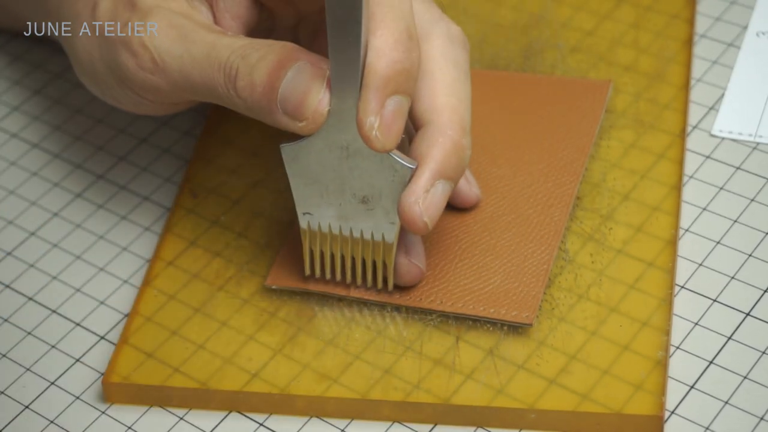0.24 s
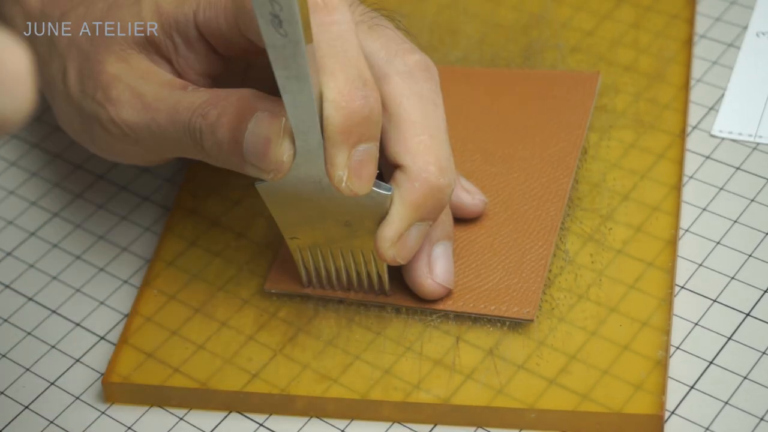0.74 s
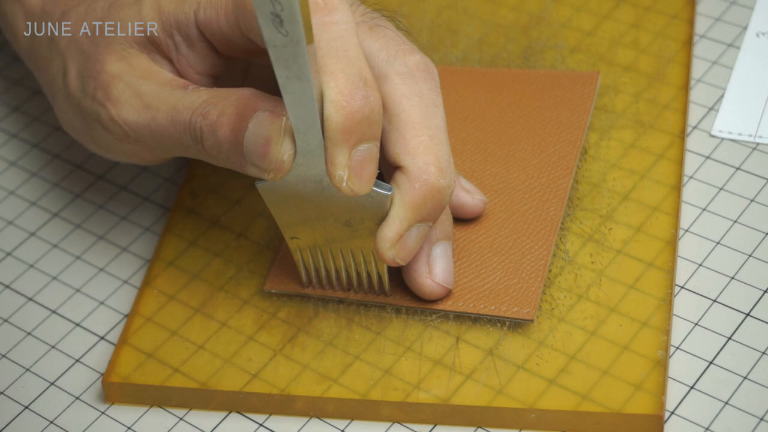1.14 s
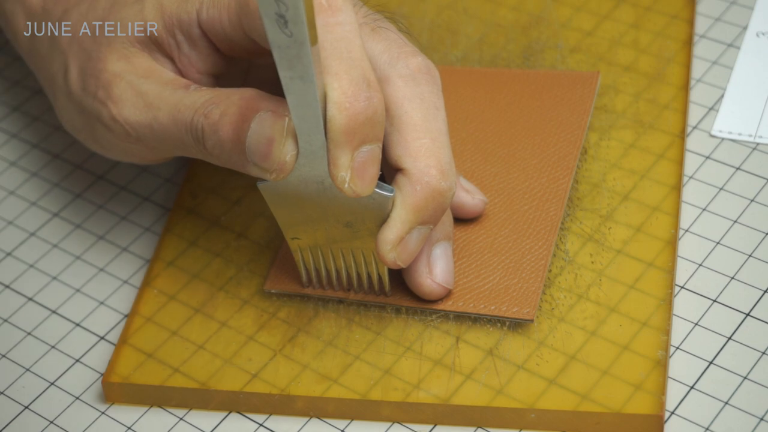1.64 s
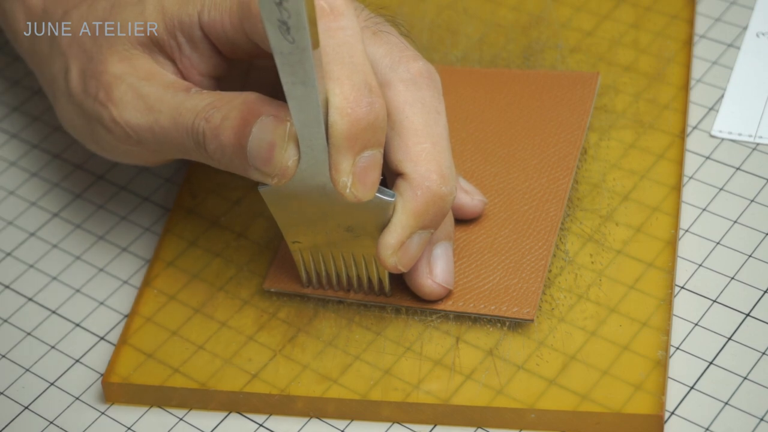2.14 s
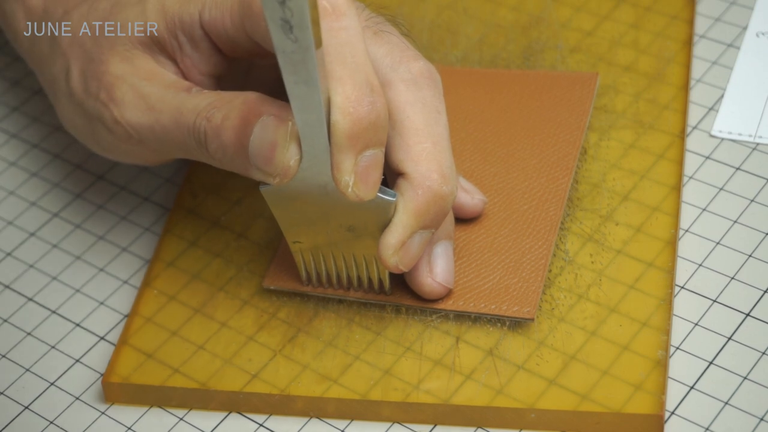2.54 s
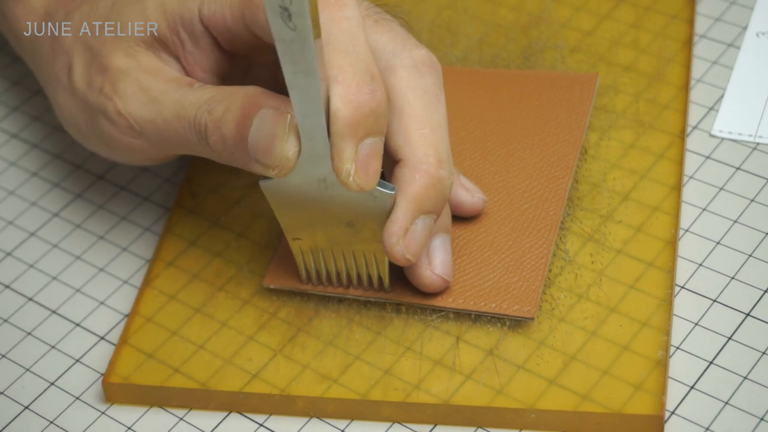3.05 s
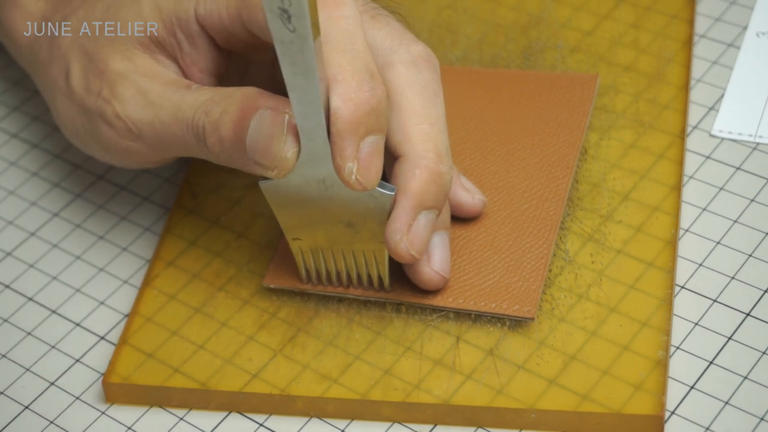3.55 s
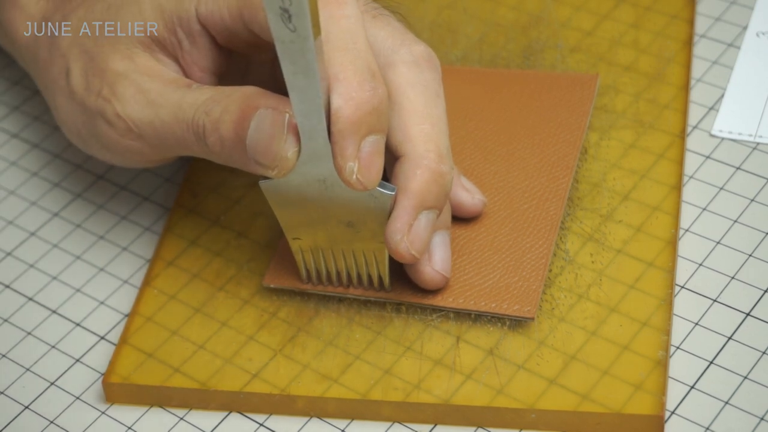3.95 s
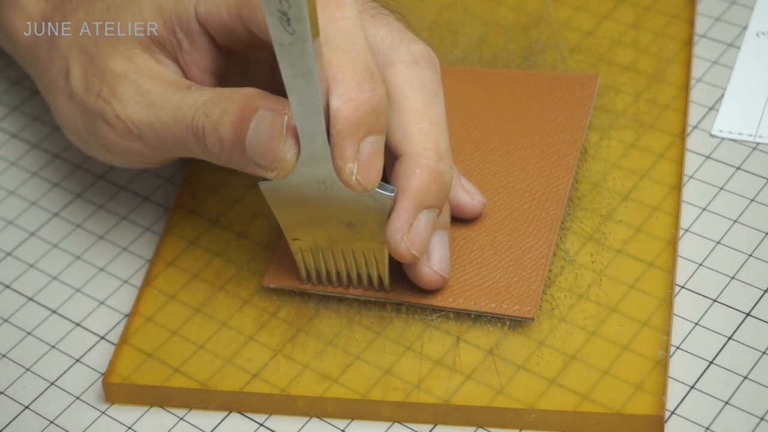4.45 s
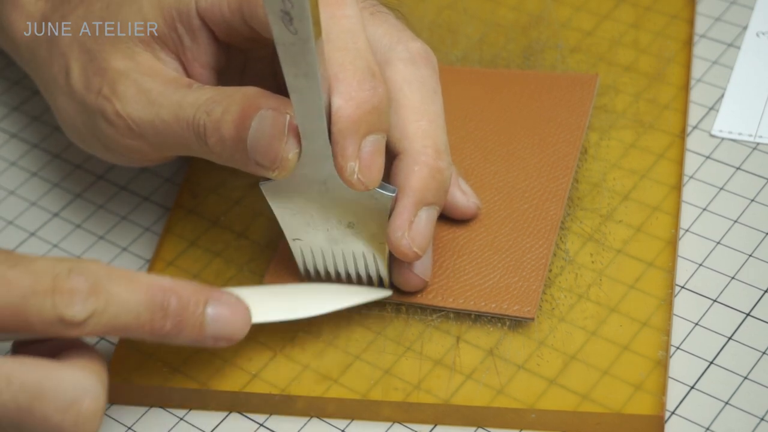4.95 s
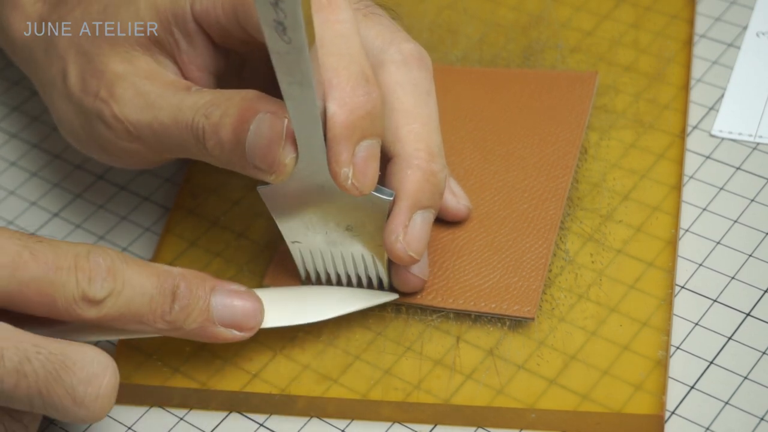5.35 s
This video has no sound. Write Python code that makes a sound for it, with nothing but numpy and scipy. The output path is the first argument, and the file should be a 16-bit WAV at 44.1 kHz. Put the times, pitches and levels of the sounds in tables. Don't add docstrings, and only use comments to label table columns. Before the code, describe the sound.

Quiet traffic hush and thin hiss, then one soft metallic tap and four loud, cracking mallet strikes, unevenly spaced, close up. Each dips the recording level, so the room's ring swells back behind it, with bright steel tinkles. A wooden handle clacks onto the bench and bounces to rest; after near quiet, a small tool clicks lightly as it is picked up.

```python
import sys
import numpy as np
from scipy import signal
from scipy.io import wavfile
from scipy.ndimage import uniform_filter1d

SR = 44100
rng = np.random.default_rng(int(sys.argv[2]) if len(sys.argv) > 2 else 0)


def boost(x):
    u = np.asarray(x, float) / 20
    return 10 ** u


def file_out(sig):
    cols = np.atleast_2d(sig).T
    lim = np.clip(cols, -1, 1)
    pcm = np.round(lim * 32767).astype(np.int16)
    wavfile.write(sys.argv[1], SR, pcm)


N = 247401

# [t/s, peak level/dB, gain duck/dB, room over the peak/dB, brightness/dB per octave]
BLOWS = [
    (0.8775, -30.5, 7.5, -9, 0),
    (1.349, -12, 7.5, -7, -3),
    (1.7829, -10, 15, -8.5, -1),
    (2.3234, -10.5, 15.5, -8, -1.5),
    (2.6633, -8.5, 13, -8.5, -1),
]
# [f/Hz, t60/s]
ROOM_DECAY = [(100, 0.74), (300, 0.67), (1000, 0.65), (3000, 0.67), (7000, 0.57), (15000, 0.37)]
# [f/Hz, correlation]
ROOM_ALIKE = [(60, .995), (130, .995), (290, .97), (640, .85), (1410, .55), (3100, .3), (6000, -.2),
              (9000, 0), (15000, -.2)]


def unit(x):
    return x / np.sqrt(np.mean(x ** 2) + 1e-20)


def along(points, hz):
    f, v = np.transpose(points)
    return np.interp(np.log(hz + 1), np.log(f + 1), v)


def curves(rows):
    s, *cols = np.transpose(rows)
    return [np.interp(np.arange(N) / SR, s, c) for c in cols]


def add(out, s, x):
    part = out[:, round(s * SR):][:, :x.shape[-1]]
    part += x[..., :part.shape[1]]


def wobble(shape, rate):
    place = np.arange(shape[-1]) * rate / SR
    knots = rng.standard_normal((shape[0], int(place[-1]) + 2))
    ease = .5 - .5 * np.cos(np.pi * (place % 1))
    left = place.astype(int)
    return knots[:, left] * (1 - ease) + knots[:, left + 1] * ease


def diffuse(size, spectrum, alike, tilt_db, patchy_db, decay=None):
    # [f/Hz, left minus right/dB]
    side_lean = [(60, 0), (240, 0.5), (950, -1.5), (3770, -2), (15000, -2.5)]
    hz, t, z = signal.stft(rng.standard_normal((2, size)), SR, nperseg=1024, noverlap=768)
    field = uniform_filter1d(rng.standard_normal(z.shape[1:]), 8, 0)
    field = uniform_filter1d(field, 6, 1)
    colour = boost(along(spectrum, hz) + tilt_db * np.log2((hz + 50) / 1000))[:, None]
    z = z * boost(patchy_db * unit(field)) * colour / np.sqrt(np.mean(colour ** 2))
    if decay:
        z = z * boost(-60 * t / along(decay, hz)[:, None])
    turn = np.arccos(np.clip(along(alike, hz), -1, 1))[:, None] / 2
    mid, side = z[0] * np.cos(turn), z[1] * np.sin(turn)
    lean = boost(along(side_lean, hz) / 2)[:, None]
    pair = np.array([(mid + side) * lean, (mid - side) / lean])
    return signal.istft(pair, SR, nperseg=1024, noverlap=768)[1][:, :size]


def ring(modes, t, attack, waver):
    hz, db, t60 = np.transpose(modes)[..., None]
    size = boost(db + 2 * rng.standard_normal(db.shape) - 60 * t / t60)
    size = size * boost(2.5 * waver * wobble(size.shape, 45))
    phase = 2 * np.pi * hz * t + waver * wobble(size.shape, 29.9)
    return np.sum(size * np.sin(phase), axis=0) * (1 - np.exp(-t / attack))


def swell(start, attack, hold, release, hz, db, rest_db, flutter_db):
    corners = np.cumsum([start, attack, hold, release])
    level_db = np.interp(np.arange(N) / SR, corners, [rest_db, db, db, rest_db])
    phase = 2 * np.pi * np.cumsum(hz + 5 * wobble((1, N), 15)) / SR
    return boost(level_db + flutter_db * wobble((1, N), 25)) * np.sin(phase)


def air():
    # [t/s, level/dB]
    traffic = [(0, -52), (.25, -56), (.5, -55), (.85, -51.5), (1.3, -53.5), (3.6, -54), (4.7, -54.5),
               (5.3, -56), (5.61, -56)]
    # [f/Hz, level/dB per Hz]
    street_colour = [(135, -62), (170, -36), (240, -24.5), (350, -11.5), (470, -12.5), (680, -6.5),
                     (1100, -5.5), (1700, -3), (2300, -4), (2900, -9.5), (3600, -15), (5000, -21),
                     (7000, -35), (10000, -72)]
    # [f/Hz, correlation]
    street_alike = [(60, 0.49), (130, 0.85), (290, 0.63), (640, 0.62), (1410, 0.56), (3100, 0.39),
                    (6820, -1.1), (15000, -0.74)]
    # [f/Hz, level/dB per Hz]
    hiss_colour = [(1000, -15.5), (4000, 4), (7000, -0.5), (10000, -2), (13000, -4), (16000, -11)]
    # [start t/s, attack/s, hold/s, release/s, f/Hz, level/dB, rest level/dB, flutter/dB]
    brake_squeal = (.22, .09, .24, .012, 2250, -61, -90, 1.5)
    engine_drone = (3.8, .12, .12, .1, 348, -71, -86, 5)
    engine_hum = (3.3, .3, .7, .3, 168, -94, -99, 4)
    street_db, = curves(traffic)
    after = np.arange(N) / SR - 2.04
    sag_db = -np.clip(10.5 - 2.5 * after, 0, None) * np.clip(after / .3, 0, 1)
    street = boost(street_db) * diffuse(N, street_colour, street_alike, 0, patchy_db=0.5)
    hiss = boost(-67) * diffuse(N, hiss_colour, [(1000, 0.12)], 0, patchy_db=-1.5)
    return boost(sag_db) * (street + hiss) + swell(*brake_squeal) + swell(*engine_drone) + swell(*engine_hum)


def jingles():
    # [f/Hz, t60/s]
    steel_modes = [(5480, 0.52), (7560, 0.25), (7770, 1), (9308, 0.16), (9647, 0.12), (10180, 0.19),
                   (11280, 0.19), (12180, .12), (13130, .15)]
    # [t/s, peak level/dB, ring level/dB, most ringing part f/Hz]
    shaken = [(1.361, -38.5, 1, 5480), (1.372, -33, 4, 11280), (1.8, -38, -5, 10180), (1.86, -25, -9, 9308),
              (2.34, -33, -6.5, 7770), (2.394, -17, -15, 13130), (2.455, -26, -5, 10180),
              (2.69, -19.5, -16, 7500), (2.725, -20, -12.5, 10180), (2.869, -33.5, -13.5, 7770),
              (2.918, -31.5, -5, 9647), (2.961, -35, -8, 10180), (3.041, -36.5, -18, 13130),
              (3.197, -54, -16, 7560)]
    # [t/s, peak level/dB, ring level/dB, part f/Hz]
    handled = [
        (.8925, -48, -18, 10180),
        (4.4133, -51, -16, 10180),
        (4.421, -68, -4, 7560),
        (4.947, -65, -15, 9308),
        (5.06, -54.5, -28, 9308),
        (5.54, -69, -17, 7770),
    ]
    out, t = np.zeros((2, N)), np.arange(SR // 3) / SR
    contacts = [(*row, -4.5) for row in shaken]
    contacts += [(*row, -17) for row in handled]
    echo_colour = [(1500, 4), (4000, 2.5), (9000, -6.5), (16000, -10.5)]  # f/Hz, level/dB per Hz
    for s, db, ring_db, part_hz, echo_db in contacts:
        modes = [(hz, ring_db - 90 * abs(np.log2(hz / part_hz)), t60)
                 for hz, t60 in steel_modes if .8 < hz / part_hz < 1.25]
        click = uniform_filter1d(rng.standard_normal((2, len(t))), size=3) * boost(4.5 - 60 * t / 0.0138)
        click = click - uniform_filter1d(click, size=16)
        echo = diffuse(len(t), echo_colour, ROOM_ALIKE, 0, patchy_db=2.5, decay=ROOM_DECAY)
        steel = [ring(modes, t, .001, waver=.7), ring(modes, t, .001, waver=.7)]
        tick = click + steel * boost([[-1.5], [1.5]]) + boost(echo_db) * echo
        add(out, s, boost(db) * tick * np.cos(1.5 * np.pi * t))
    return out


def knocks():
    # [t/s, peak level/dB, room over the peak/dB, brightness/dB per octave]
    contacts = [(0.8922, -28.5, -27, 9.5), (3.184, -28.5, -9, 7.5), (3.1981, -9.5, -16, -1.5),
                (3.2256, -35, -23, 1), (3.241, -19.5, -17.5, -3), (3.2555, -27, -25, -0.5),
                (3.274, -28, -23, -4), (3.314, -34, -17, 0), (3.333, -26.5, -32, -13.5),
                (3.344, -34, -17, 0), (4.405, -50, -13, 3), (4.4133, -38, -12.5, 10.5),
                (4.4198, -40.5, -18, 7.5)]
    # [f/Hz, level/dB, t60/s]
    handle = [(797, -2, 0.03), (1013, 0, 0.009), (1300, 12.5, 0.0083), (1710, 4.5, 0.017), (2410, -6, 0.03),
              (3800, -15.5, 0.011), (5160, -14.5, 0.0054)]
    # [f/Hz, level/dB per Hz]
    dull_room = [(59, -75), (100, -41), (339, -8), (458, -11), (684, 2.5), (741, -10), (819, 1.5),
                 (924, 0.5), (1720, -2), (3010, -22.5), (12000, -61), (15600, -90), (22000, -120)]
    out, t = np.zeros((2, N)), np.arange(SR // 2) / SR
    for s, db, room_db, tilt_db in contacts:
        modes = [(hz, level + tilt_db * np.log2(hz / 1000), t60 * boost(-.6 * tilt_db))
                 for hz, level, t60 in handle]
        snap = np.diff(uniform_filter1d(rng.standard_normal(len(t) + 1), size=6))
        snap = snap * boost(-11.5 + 1.46 * tilt_db - 60 * t / 0.002)
        room = diffuse(len(t), dull_room, ROOM_ALIKE, tilt_db, patchy_db=0.5, decay=ROOM_DECAY)
        room = room * (1 - np.exp(-t / 0.00097))
        wood = boost(-6.0) * (ring(modes, t, 0.00064, waver=0) + snap) * boost([[-1], [1]])
        add(out, s, boost(db) * (wood + boost(room_db) * room))
    return signal.sosfilt(signal.butter(3, 260, 'high', fs=SR, output='sos'), out)


def blows():
    # [delay/ms, left level/dB, right level/dB]
    echoes = [(1.7, -14, -15), (2.65, -9, -9), (3.9, -5, -3), (5.2, -13, -11), (7.5, -10, -10)]
    # [f/Hz, level/dB, t60/s]
    bench = [(116.9, -24, 0.59), (129, -27.5, 0.46), (182, -26, 0.57), (233, -20, 0.74), (315, -28, 0.39),
             (453, -14.5, 0.58), (520, -28, 0.37), (571, -18.5, 0.66), (616, -13.5, 0.56),
             (684, -18.5, 0.72), (806, -13, 0.59), (1069, -16, 0.73), (1381, -20.5, 0.77),
             (1977, -17, 0.66)]
    # [f/Hz, level/dB per Hz]
    tap_room = [(60, -56), (120, -20), (250, -9), (400, -4), (600, 0.5), (850, -4.5), (1200, -8),
                (2000, -11.5), (2800, -12), (4000, -19.5), (5500, -33.5), (16000, -41)]
    # [f/Hz, level/dB per Hz]
    blow_room = [(40, -78), (60, -64.5), (120, -21.5), (170, -19.5), (330, -5.5), (520, -4.5), (800, -1.5),
                 (1300, 1), (2000, 0.5), (2700, -2), (3500, -8.5), (5000, -15), (6900, -25.5),
                 (10000, -19.5), (16000, -31)]
    wall_s = 0.011
    out, t = np.zeros((2, N)), np.arange(SR) / SR
    for answer, (s, db, duck_db, room_db, tilt_db) in zip([tap_room] + 4 * [blow_room], BLOWS):
        force_db = db + duck_db
        late_ms = 1000 * t[:SR // 20] - 1.9
        u = late_ms / np.where(late_ms < 0, .34, .5)
        push = (1 - u * u) * np.exp(-u * u / 2) * (1 - .45 * np.tanh(u + .6)) * boost(2)
        crack = rng.standard_normal((2, SR // 20)) * boost(-26 + 0.9 * force_db) * np.exp(-(late_ms + .9) ** 4)
        grit = uniform_filter1d(crack, size=5) * boost(4.5)
        add(out, s, boost(force_db) * (push * boost([[-.8], [.8]]) + crack + grit))
        for ms, *side_db in echoes:
            add(out, s + ms / 1000, boost(force_db) * (push + grit) * boost(side_db)[:, None])
        wall = 0.74 + 0.34 * np.exp(-np.abs(t - wall_s) / 0.0054)
        fill = 0.27 * (t > .002) + wall / (1 + np.exp(-(t - wall_s) / 0.00034))
        colour = [(hz, level + tilt_db * np.log2(np.clip(hz, 700, 9000) / 1000)) for hz, level in answer]
        room = fill * diffuse(len(t), colour, ROOM_ALIKE, 0, patchy_db=0.4, decay=ROOM_DECAY)
        room = room * boost(1.6 * wobble((1, len(t)), 151.5))
        room = room + ring(bench, t, 0.013, waver=0.19)
        add(out, s, boost(force_db + room_db) * room)
    return out


def scene():
    return air() + jingles() + knocks() + blows()


def low_pass(x):
    return signal.sosfilt(signal.butter(12, 15830, fs=SR, output="sos"), x)


def record(dry):
    # [from t/s, to t/s, level/dB]
    scene_change = (.552, .5703, -40)
    t, gain_db = np.arange(N) / SR, np.zeros(N)
    for s, _, duck_db, *_ in BLOWS:
        after = np.clip(t - s, 0, None) / 0.17
        gain_db = np.where(t >= s, -duck_db * np.exp(-after ** 1.16), gain_db)
    from_s, to_s, gap_db = scene_change
    gap = uniform_filter1d(1.0 * ((t > from_s) & (t < to_s)), 60)
    ends = np.clip(np.minimum(t, t[::-1]) / .004, 0, 1)
    mix = dry * boost(gain_db) * ends
    mix = signal.sosfiltfilt(signal.butter(3, 88, 'high', fs=SR, output='sos'), mix)
    mix = signal.sosfiltfilt(signal.butter(12, 15950, fs=SR, output='sos'), mix)
    return low_pass(mix * boost(gap_db * gap))


dry = scene()
out = record(dry)
file_out(out)
```